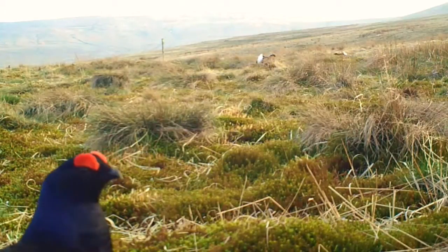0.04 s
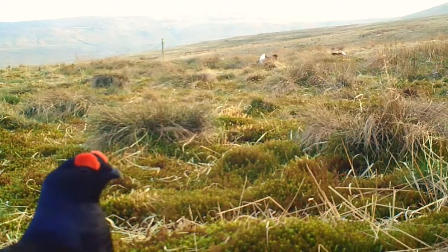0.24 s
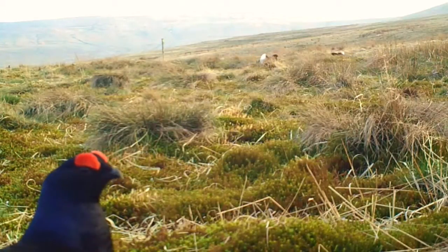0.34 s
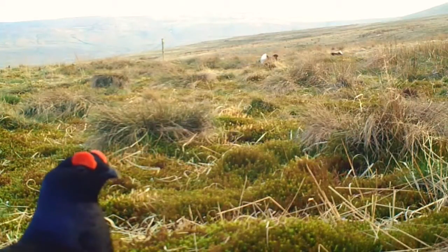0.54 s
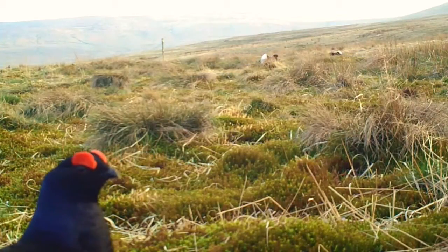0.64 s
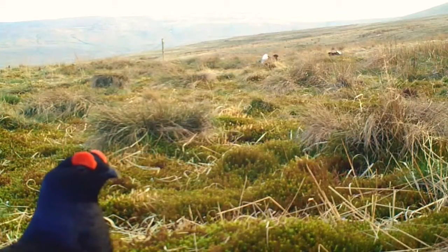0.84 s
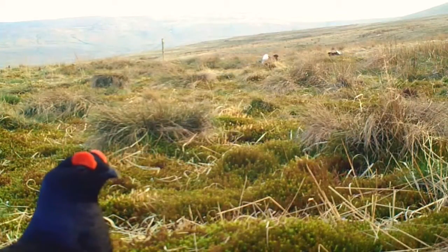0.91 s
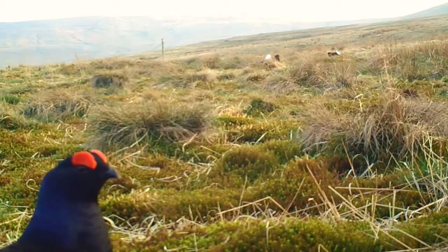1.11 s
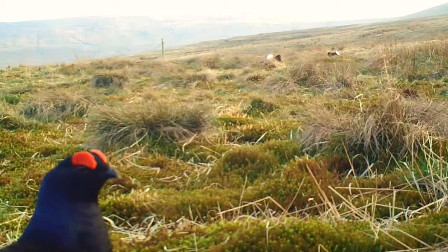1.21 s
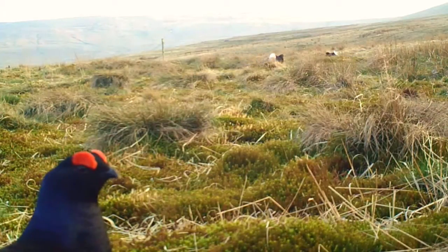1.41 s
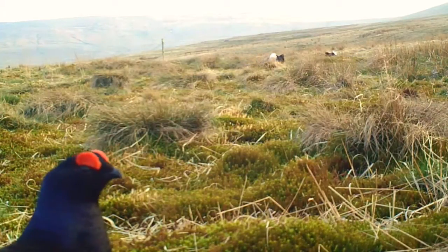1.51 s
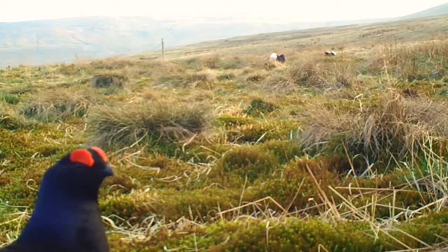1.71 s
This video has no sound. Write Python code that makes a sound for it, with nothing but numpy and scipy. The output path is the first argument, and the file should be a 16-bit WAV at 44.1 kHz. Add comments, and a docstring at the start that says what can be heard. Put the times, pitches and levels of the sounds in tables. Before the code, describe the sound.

A black grouse close by gives one harsh, hissing call that swells to a burst and stops short. A much fainter, stuttering wheeze with tiny bill ticks follows, while light wind buffets the microphone on an open moor.

```python
"""Black grouse on a windy moor

A grouse close by gives one harsh, hissing call that swells to a burst and stops short.
Air rasps through the shifting resonances of its throat, with thin whistles on top; a much
fainter, stuttering wheeze follows. Its bill ticks before the call and in the wheeze.
Low wind buffets the microphone, and a far bird gives two soft notes."""
import sys
import numpy as np
from scipy import signal
from scipy.fft import rfft, irfft
from scipy.io import wavfile

SR = 44100
rng = np.random.default_rng(int(sys.argv[2]) if len(sys.argv) > 2 else 0)


def put_to_file(sound):
    """Save the sound as 16-bit audio at rate SR, in the file named by the first command-line argument."""
    columns = np.atleast_2d(sound).T  # one column per channel
    safe = np.clip(columns, -1, 1)
    whole_steps = np.round(safe * 32767)
    wavfile.write(sys.argv[1], SR, whole_steps.astype(np.int16))


N = 77175
T = np.arange(N) / SR
HZ = np.fft.rfftfreq(N, 1 / SR)


def amp(db):
    """Decibels to gain."""
    return 10 ** (np.asarray(db) / 20)


def unit_rms(x):
    """Scales a signal to rms 1."""
    return x / np.sqrt(np.mean(abs(x) ** 2) + 1e-20)


def envelopes(table, fade_db_per_s=1500):
    """One gain curve per dB column, fading quickly to silence outside the table's times."""
    times, *columns = np.transpose(table)
    outside_s = np.maximum(np.maximum(times[0] - T, T - times[-1]), 0)
    return [amp(np.interp(T, times, db) - fade_db_per_s * outside_s) for db in columns]


def glide(table):
    """A frequency curve through (time_s, centre_hz) points."""
    return np.interp(T, *np.transpose(table))


def noise(spectrum):
    """Noise at rms 1, coloured by (freq_hz, relative_db) points."""
    hz, db = np.transpose(spectrum)
    colour = amp(np.interp(np.log(HZ + 1), np.log(hz), db))
    return unit_rms(irfft(rfft(rng.standard_normal(N)) * colour, N))


def drift(rate_hz):
    """Smooth random motion at rms 1, up to about the given rate."""
    return unit_rms(irfft(rfft(rng.standard_normal(N)) / (1 + (HZ / rate_hz) ** 4), N))


def resonance(centre_hz, width_hz, steadiness=0.56):
    """Turbulence in a steep resonance that may glide; it saturates, which steadies its strength."""
    shape = 1 / (1 + abs(2 * np.fft.fftfreq(N, 1 / SR) / width_hz) ** 3)
    turbulence = rng.standard_normal(N) + 1j * rng.standard_normal(N)
    band = unit_rms(np.fft.ifft(shape * np.fft.fft(turbulence)))
    saturated = band / (abs(band) ** 2 + 0.2) ** (steadiness / 2)
    carrier = np.exp(2j * np.pi * np.cumsum(centre_hz * np.ones(N)) / SR)
    return unit_rms((saturated * carrier).real)


def breathy_note(start_s, length_s, from_hz, to_hz, width_hz, level_db):
    """A narrow resonance that swells, glides and fades."""
    progress = np.clip((T - start_s) / length_s, 0, 1)
    arch = 2 * np.sqrt(progress * (1 - progress))
    return amp(level_db) * arch * resonance(from_hz + (to_hz - from_hz) * progress, width_hz)


def wind(hiss_db=-69, hiss_follow=0.91):
    """Gusts rumble and rush on the microphone; the hiss of the grass swells with the rush."""
    # strength of the gusts: time_s, rumble_db, rush_db
    gusts = [(0, -78, -65.5), (.26, -75, -64.5), (.55, -70.5, -57.5), (0.7, -46.5, -58), (.75, -66, -60),
             (.8, -66, -55.5), (.9, -74, -58.5), (1.03, -59, -61.5), (1.14, -72, -61.5), (1.48, -71.5, -66),
             (1.621, -57.5, -64.5), (1.69, -69, -65.5)]
    # colour of the deep buffeting: freq_hz, relative_db
    rumble_colour = [(15, -22), (40, -7.5), (100, -1), (200, -20), (500, -66)]
    # colour of the rushing air: freq_hz, relative_db
    rush_colour = [(60, -31.5), (130, 0.5), (500, -14), (900, -23), (2000, -29.5), (6000, -64)]
    # colour of the hissing grass: freq_hz, relative_db
    grass_colour = [(600, 6.5), (1200, -5), (2500, -1.5), (5000, -3), (8000, -7), (13000, -16.5)]
    times, *columns = np.transpose(gusts)
    rumble_db, rush_db = (np.interp(T, times, db) for db in columns)
    grass = amp(hiss_db + hiss_follow * (rush_db - rush_db.mean())) * noise(grass_colour)
    return amp(rumble_db) * noise(rumble_colour) + amp(rush_db) * noise(rush_colour) + grass


def moor_reverb(x, scatter_db=-11, scatter_t60_s=0.08, tail_db=-20, tail_t60_s=0.61):
    """Adds a quick scatter from the tussocks and a faint, long tail from the hillside."""
    # colour of the dark tail: freq_hz, relative_db
    tail_colour = [(1200, 18), (2000, 1.5), (4200, -4)]
    scatter = unit_rms(rng.standard_normal(N) * amp(-60 * T / scatter_t60_s))
    tail = unit_rms(noise(tail_colour) * amp(-60 * T / tail_t60_s))
    response = (amp(scatter_db) * scatter + amp(tail_db) * tail) / np.sqrt(N)
    return x + signal.fftconvolve(x, response)[:N]


def far_bird(width_hz=63):
    """A distant bird gives two soft, husky, falling notes."""
    # its notes: start_s, length_s, from_hz, to_hz, level_db
    notes = [(.849, 0.019, 985, 915, -66), (0.878, 0.035, 1006, 913, -64)]
    return sum(breathy_note(*note, width_hz, level_db) for *note, level_db in notes)


def bill_ticks(decay_s=0.00045):
    """Tiny dry clicks of the grouse's bill, each ringing for a moment."""
    # ticks before the call and in the wheeze: start_s, pitch_hz, level_db
    ticks = [(0.014, 4050, -53.5), (.032, 3970, -49), (1.162, 5150, -46), (1.184, 4520, -45.5)]
    out = np.zeros(N)
    for start_s, pitch_hz, level_db in ticks:
        age = np.maximum(T - start_s, 0) / decay_s
        envelope = amp(level_db) * age * np.exp(1 - age)
        out += envelope * np.sin(2 * np.pi * pitch_hz * (T - start_s))
    return out


def wheeze(pitch_hz=511, jitter=0.072, sag_per_s=4, swell_s=0.0065, splutter_db=2):
    """A faint stutter of falling squeaks, each with a puff of air, over a spluttering hiss."""
    # the grouse's short squeaks: peak_s, tone_db, puff_db
    squeaks = [(1.089, -69, -63.5), (1.116, -61.5, -63.5), (1.138, -62, -73), (1.18, -61.5, -62),
               (1.231, -67.5, -70), (1.268, -66, -69)]
    # swell of the high hiss: time_s, level_db
    hiss_levels = [(1.04, -75.5), (1.17, -65), (1.26, -67.5), (1.31, -78)]
    harmonics_db = {2: -8, 3: 0, 4: -5.5}  # the fundamental is absent
    splutter = unit_rms(amp(splutter_db * drift(146)))
    peak_s, tone_db, puff_db = np.transpose(squeaks)
    nearest = abs(T - peak_s[:, None]).argmin(0)
    from_peak_s = T - peak_s[nearest]
    swell = np.exp(-(from_peak_s / swell_s) ** 2 / 2)
    sag = np.exp(-sag_per_s * np.clip(from_peak_s, -2 * swell_s, 2 * swell_s))
    cycles = np.cumsum(pitch_hz * sag * (1 + jitter * drift(pitch_hz))) / SR
    tone = sum(amp(db) * np.sin(2 * np.pi * k * cycles) for k, db in harmonics_db.items())
    hiss = envelopes(hiss_levels)[0] * resonance(4700, width_hz=4500)
    puff = amp(puff_db[nearest]) * resonance(3900, width_hz=560)
    return hiss * splutter + swell * (puff + amp(tone_db[nearest]) * tone)


def syrinx_rasp(rate_hz=189.3, jitter=0.4, depth=0.36, spread_db=1.4):
    """A fluttering gain: the syrinx lets air through in uneven puffs."""
    cycles = np.cumsum(rate_hz * np.exp(jitter * drift(114.5))) / SR
    pulsing = 1 + depth * np.cos(2 * np.pi * cycles)
    return unit_rms(pulsing * amp(spread_db * drift(61)))


def ring_and_whistles():
    """The faint ring of the opening bill ticks, then thin throat whistles in the call and the wheeze."""
    # the ring, then the whistles: start_s, length_s, from_hz, to_hz, width_hz, level_db
    notes = [(.005, 0.09, 3940, 3966, 560, -70), (0.306, 0.022, 3685, 2770, 300, -50.5),
             (0.316, .03, 5650, 5520, 330, -53), (0.526, 0.048, 6890, 6690, 300, -56.5),
             (.532, 0.044, 9450, 9360, 450, -69), (0.547, 0.032, 3400, 3465, 252, -44.5),
             (0.71, 0.041, 4976, 5190, 900, -56), (0.742, 0.012, 8530, 8710, 250, -58),
             (1.113, 0.044, 4670, 5400, 550, -62), (1.156, 0.047, 5310, 5230, 330, -59.5),
             (1.255, 0.011, 3907, 4120, 200, -58)]
    return syrinx_rasp() * sum(breathy_note(*note) for note in notes)


def grouse_call(rush_share_db=-27.5):
    """Air rasps through four throat resonances, over a broad rush and under a treble hiss."""
    # strength of each resonance: time_s, low_db, middle_db, main_db, upper_db
    throat_levels = [(.231, -74, -99, -56.5, -90), (.24, -72, -86, -45.5, -71),
                     (.254, -66.5, -80, -41, -62.5), (.279, -55, -71, -45, -65),
                     (0.299, -58, -63, -48, -78), (.311, -52, -66, -40, -74), (.328, -47.5, -73, -46, -53),
                     (.347, -54.5, -58, -48.5, -61.5), (.39, -49, -61.5, -46.5, -59.5),
                     (.416, -54, -62, -58, -79), (.444, -49.5, -61, -48, -59),
                     (0.52, -60.5, -65.5, -51.5, -70.5), (0.534, -47, -65, -44, -56),
                     (0.561, -53.5, -64, -42.5, -67), (.583, -66, -65, -51.5, -70),
                     (.642, -57, -60, -57, -82), (.649, -50, -45.5, -46, -63),
                     (.69, -45, -42.5, -43.5, -52), (.736, -45, -38, -44, -52),
                     (.75, -41, -42.5, -39.5, -48), (.757, -63.5, -68, -56, -64),
                     (.785, -70, -82, -67, -81)]
    # the low resonance sags, then rises as the bill opens for the burst: time_s, centre_hz
    low_glide = [(.33, 1903), (.56, 1812), (.66, 1995)]
    # the main resonance leaps up at the start, then settles: time_s, centre_hz
    main_glide = [(.23, 3710), (.247, 3897), (.31, 3751), (.6, 3844)]
    # the upper resonance dips and wavers: time_s, centre_hz
    upper_glide = [(.245, 6380), (.33, 5483), (.39, 5750), (.48, 5384), (.7, 5857)]
    # hiss between and above the resonances: freq_hz, relative_db
    hiss_colour = [(1500, -7), (4800, 9), (6600, 6.5), (7500, 0), (8900, 2), (10200, -4), (11100, -0.5),
                   (12500, -11), (14000, -32)]
    # that hiss peaks at the burst: time_s, level_db
    hiss_levels = [(.23, -73), (.33, -65), (.52, -70.5), (.55, -57), (.59, -70.5), (.69, -58.5),
                   (.736, -53), (.75, -45.5), (.765, -67)]
    puffs = syrinx_rasp()
    gains = envelopes(throat_levels)
    bands = [resonance(glide(low_glide), width_hz=357),
             resonance(2680, width_hz=660),
             resonance(glide(main_glide), width_hz=650),
             resonance(glide(upper_glide), width_hz=550)]
    throat = sum(gain * band for gain, band in zip(gains, bands))
    rush = amp(rush_share_db) * sum(gains) * resonance(2300, width_hz=1800)
    hiss = envelopes(hiss_levels)[0] * noise(hiss_colour)
    return (throat + rush) * puffs + hiss * np.sqrt(puffs)


def scene():
    """The grouse and the far bird ring out on the moor over a bed of wind, in mono."""
    grouse = grouse_call() + ring_and_whistles() + wheeze() + bill_ticks()
    return (moor_reverb(grouse + far_bird()) + wind())[None]


def record(dry):
    """A steep low-pass trims the highest treble."""
    lowpass = signal.firwin(511, cutoff=13800, window=("kaiser", 9), fs=SR)
    return signal.oaconvolve(dry, lowpass[None], "same")


dry = scene()
out = record(dry)
put_to_file(out)
```